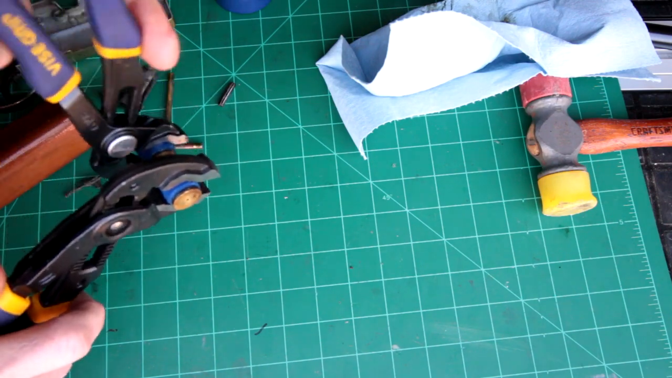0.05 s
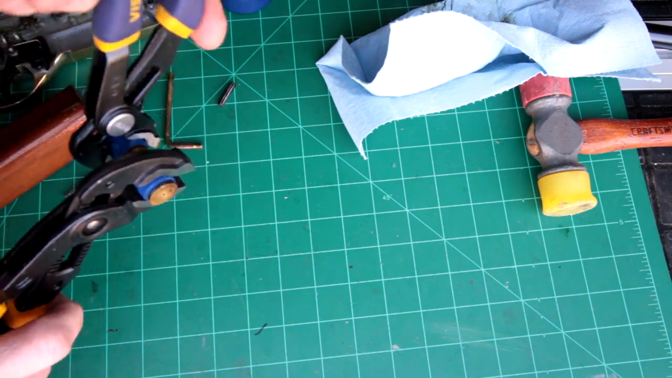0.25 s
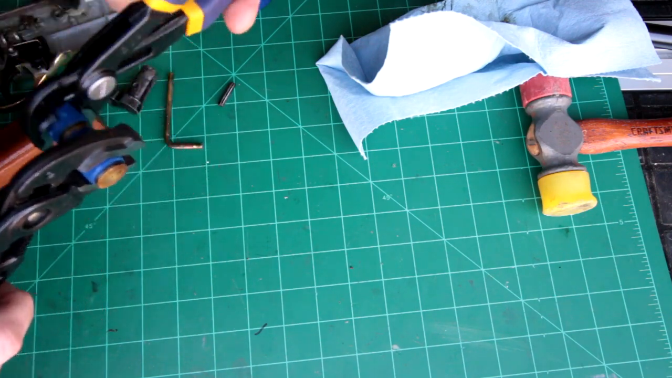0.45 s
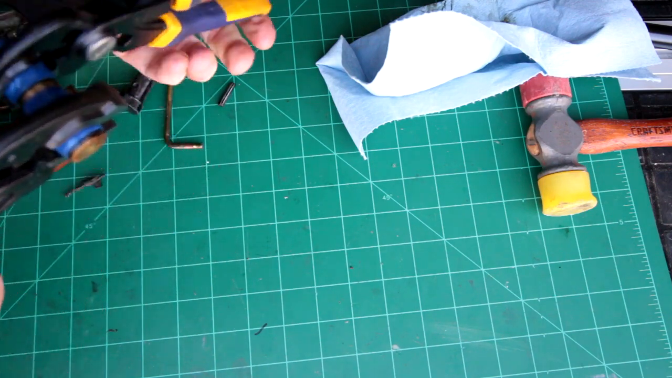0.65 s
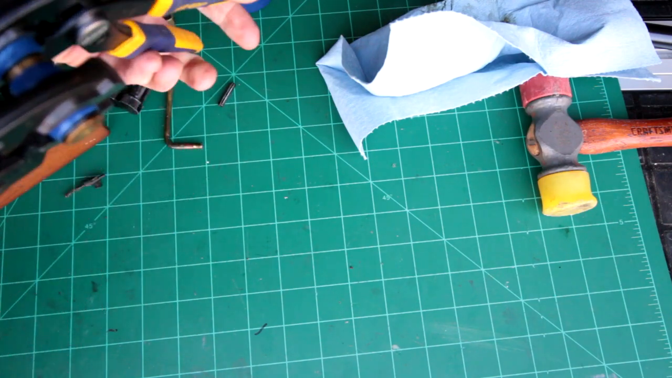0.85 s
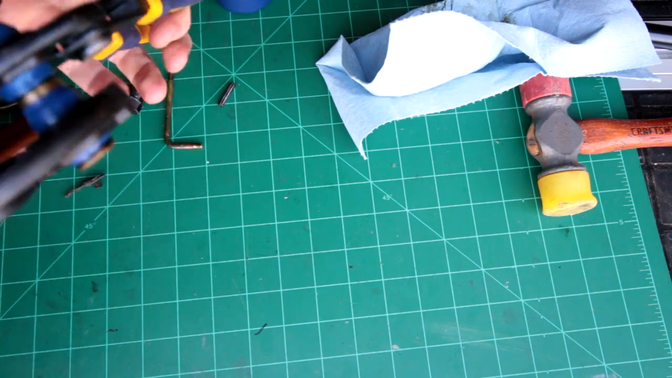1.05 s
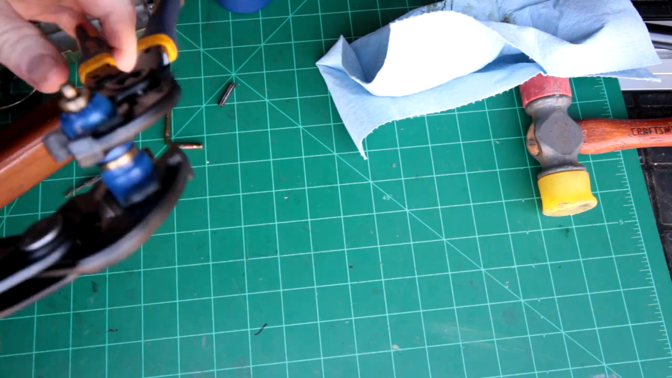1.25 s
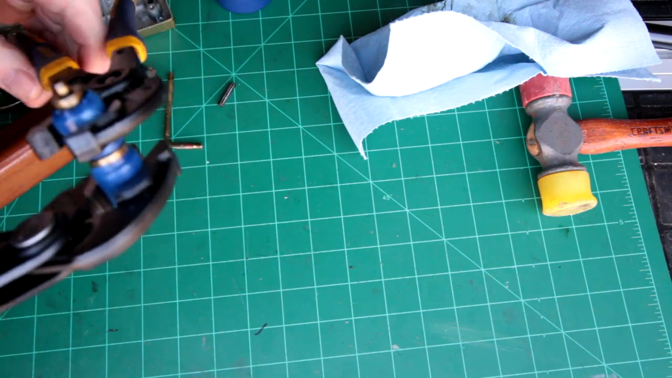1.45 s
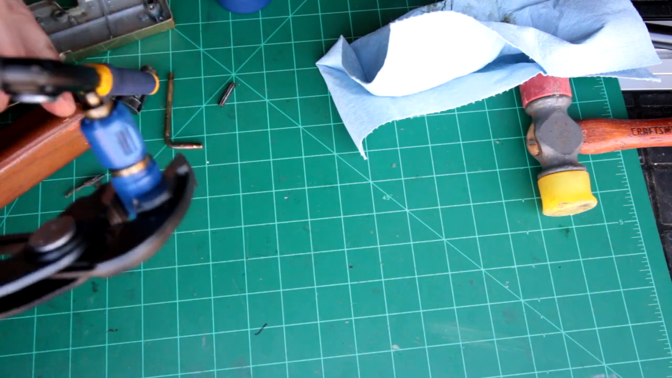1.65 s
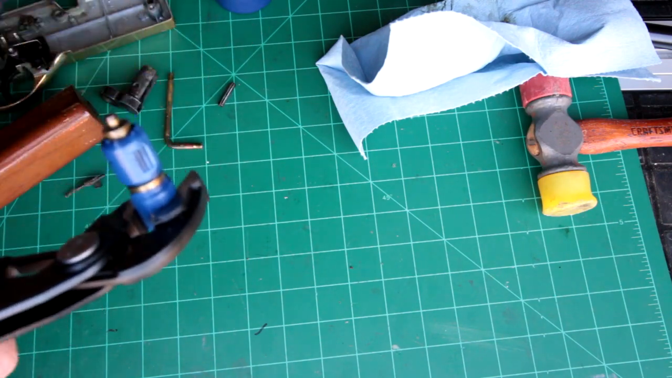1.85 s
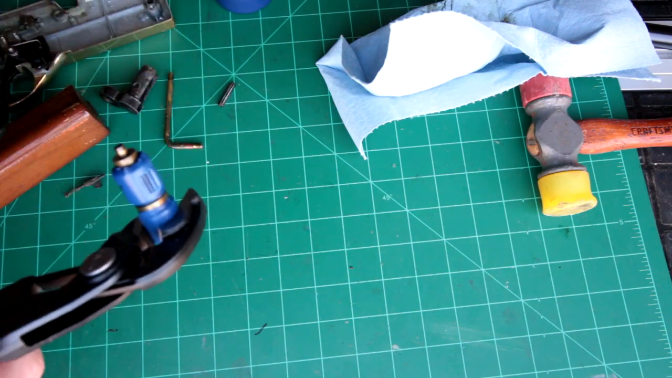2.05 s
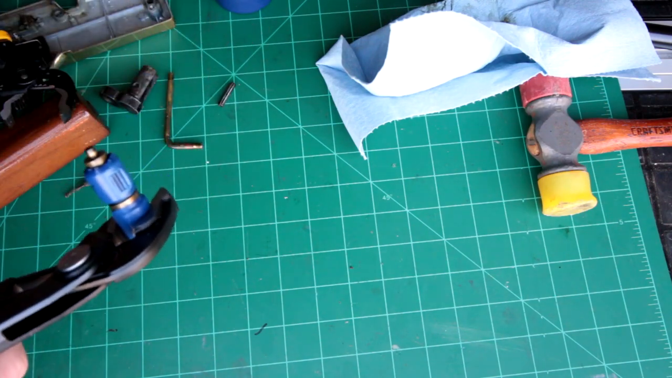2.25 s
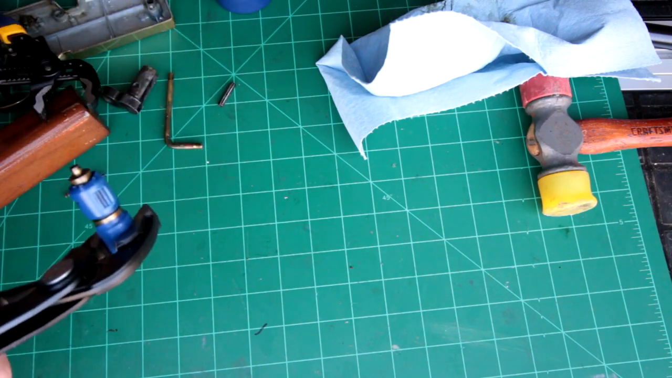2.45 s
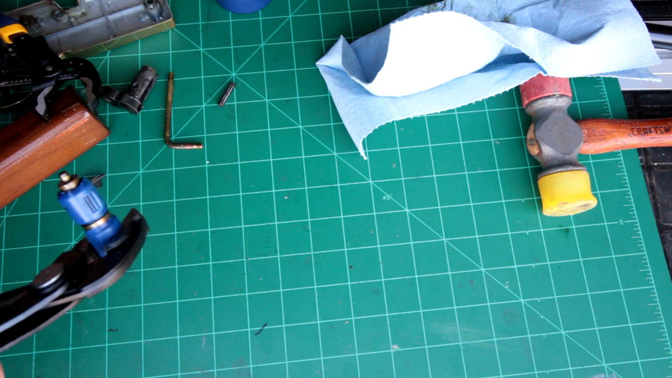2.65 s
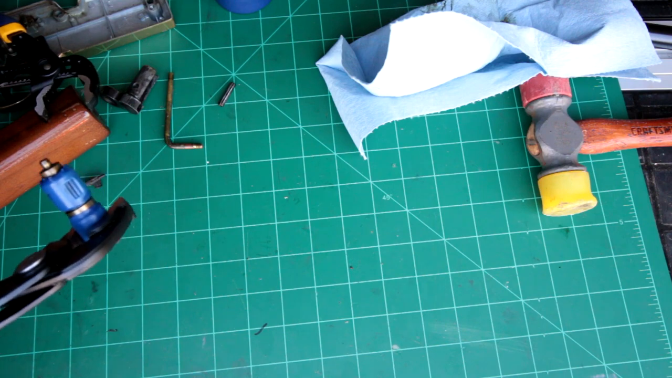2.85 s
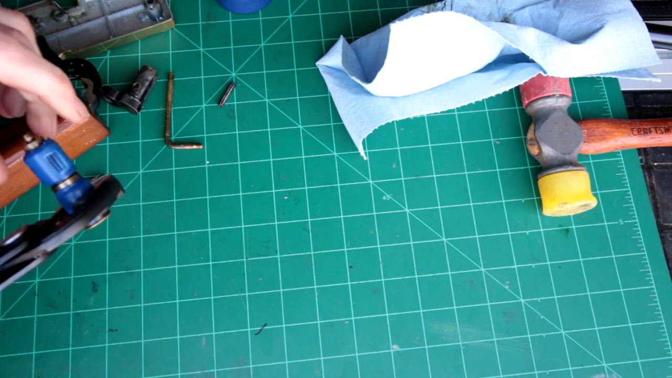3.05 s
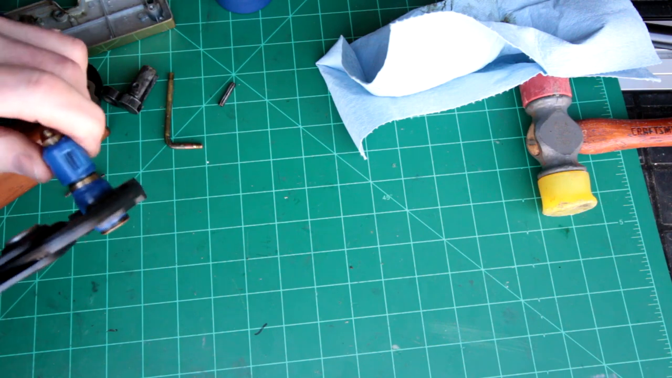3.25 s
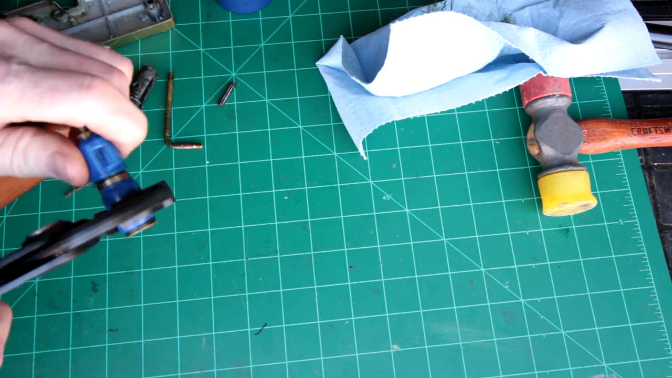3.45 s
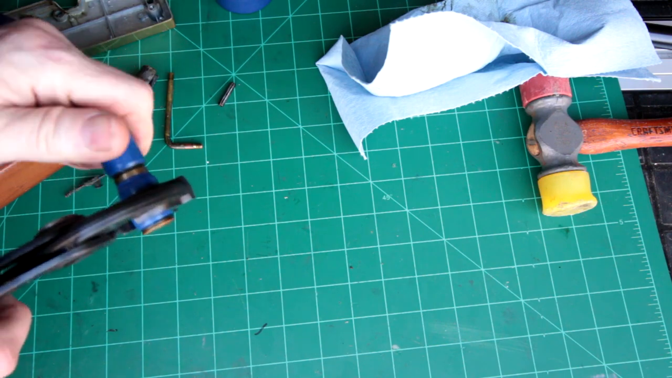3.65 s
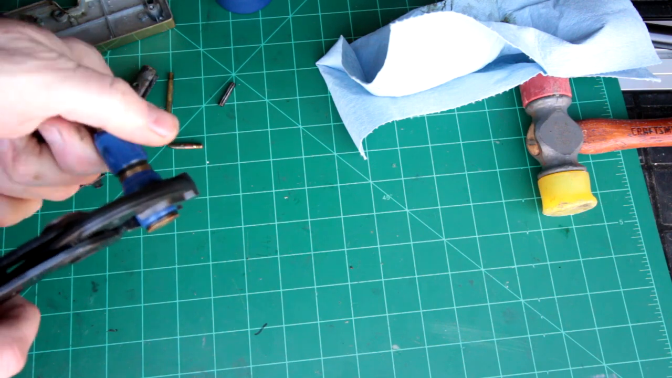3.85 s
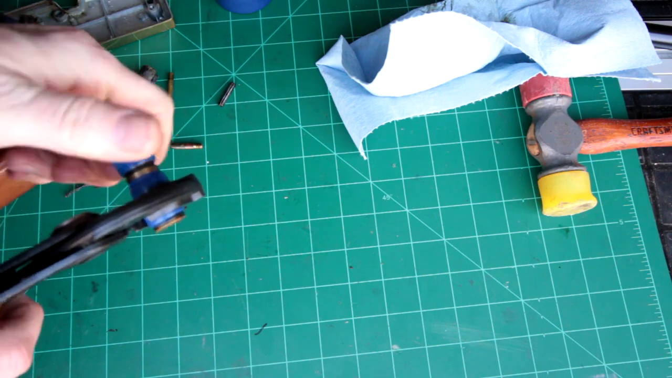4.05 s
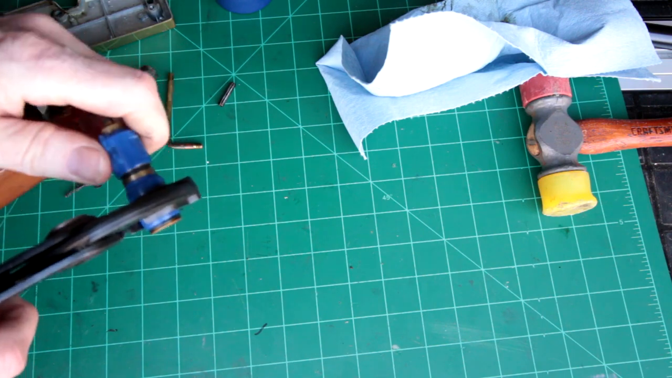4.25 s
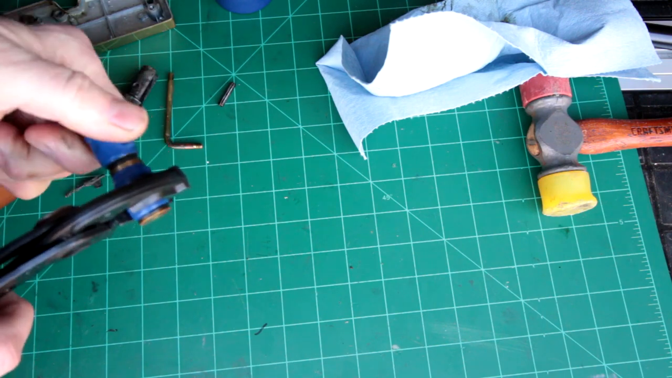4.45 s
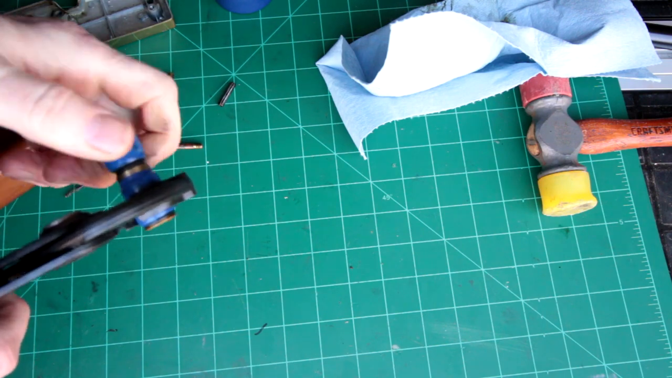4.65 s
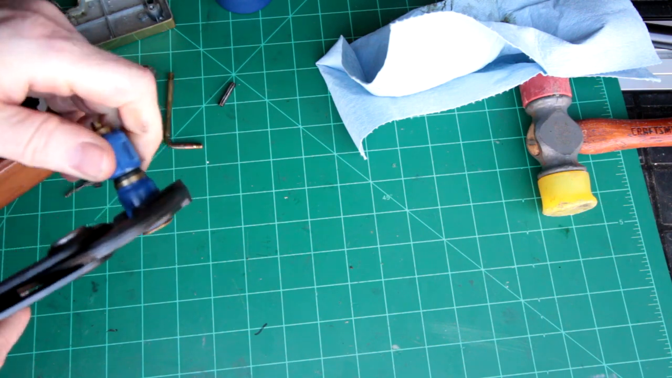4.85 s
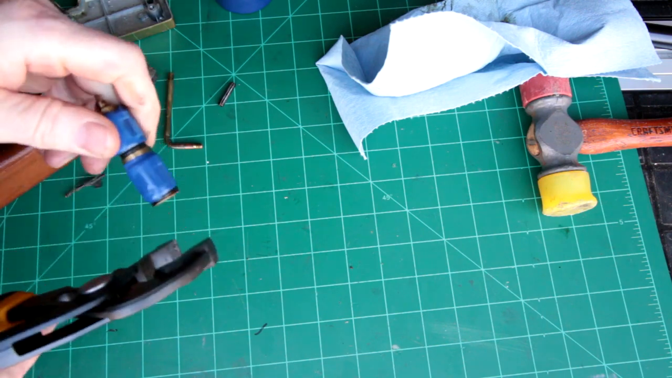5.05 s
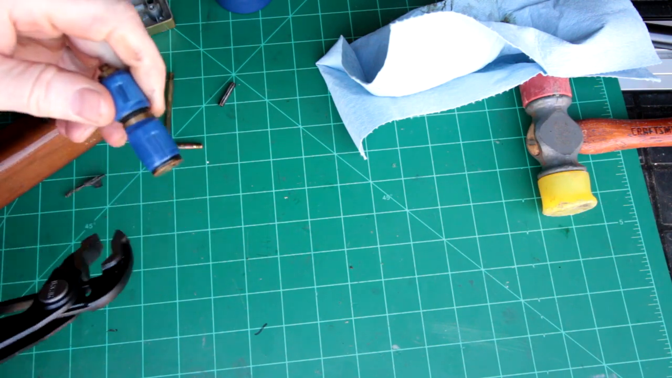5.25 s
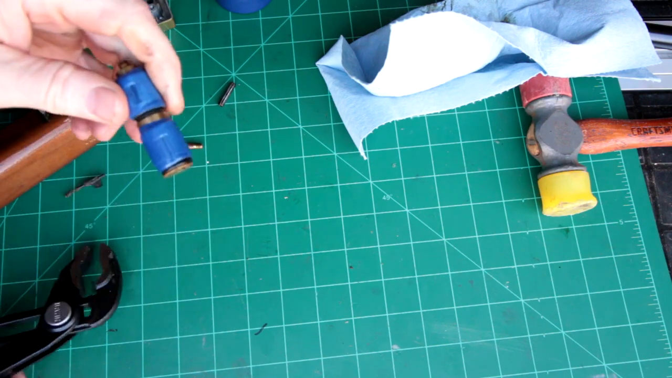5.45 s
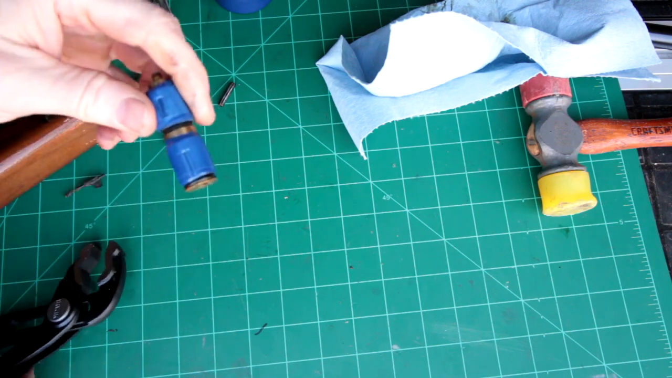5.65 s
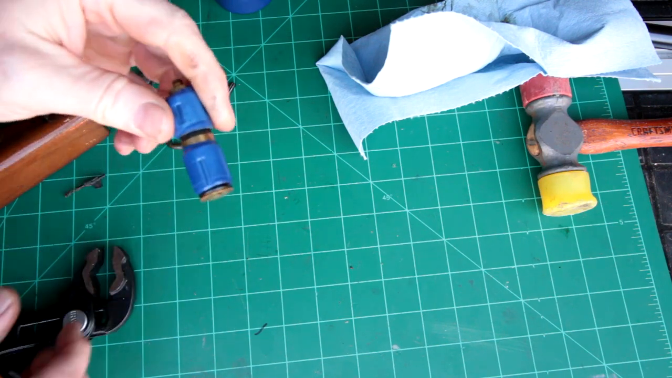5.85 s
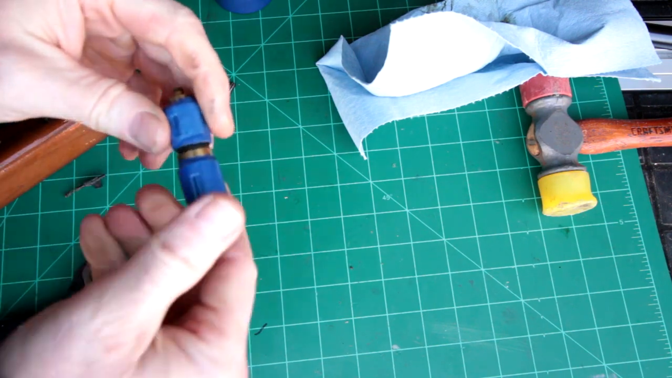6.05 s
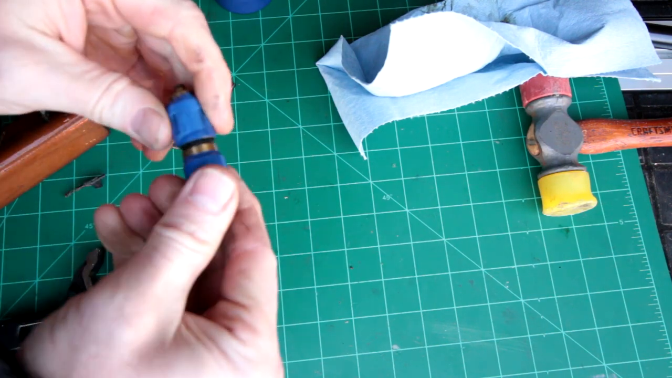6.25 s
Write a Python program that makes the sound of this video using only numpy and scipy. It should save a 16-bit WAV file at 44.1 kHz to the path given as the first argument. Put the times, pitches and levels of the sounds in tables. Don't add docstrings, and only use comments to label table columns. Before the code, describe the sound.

Near silence with faint hand rubs, then a small joint snap. Steel pliers hit a matted wooden table with a bright ringing crack, bounce briefly and settle with a duller knock. After a long quiet gap, another joint snaps and second pliers land in stages, ending in a heavy flat thump and fading rattles. Very close microphone, small room, soft hiss.

```python
import sys
import numpy as np
from scipy import signal
from scipy.fft import rfft, irfft, next_fast_len
from scipy.io import wavfile
from scipy.ndimage import uniform_filter1d

SR = 44100
rng = np.random.default_rng(int(sys.argv[2]) if len(sys.argv) > 2 else 0)


def dump_mix(stems):
    frames = np.atleast_2d(stems).T
    limited = np.clip(frames, -1, 1)
    pcm = np.round(limited * 32767).astype(np.int16)
    wavfile.write(sys.argv[1], SR, pcm)


def gain_from_decibels(decibels):
    exponent = np.asarray(decibels, float) / 20
    return 10 ** exponent


N = 278712


def unit(x):
    return x / np.sqrt(np.mean(x ** 2) + 1e-20)


def along(points, hz):
    f, value = np.transpose(points)
    return np.interp(np.log(hz + 1), np.log(f + 1), value)


def filtered(x, response):
    size = next_fast_len(x.shape[-1] + 4096)
    spectrum = rfft(x, size) * response(np.fft.rfftfreq(size, 1 / SR))
    return irfft(spectrum, size)[..., :x.shape[-1]]


def band(hz, width_hz, size):
    noise = rng.standard_normal(size)
    return unit(filtered(noise, lambda f: 1 / (1 + ((f - hz) / (width_hz / 2)) ** 2)))


def ringing(modes, t, attack, scatter_db, rough):
    hz, db, t60 = np.transpose(modes)[..., None]
    strength, detune = rng.standard_normal((2,) + hz.shape)
    wander = rough * np.cumsum(rng.standard_normal((len(modes), len(t))), axis=1) * np.sqrt(hz / SR)
    wander = uniform_filter1d(wander, size=64, axis=1)
    phase = 2 * np.pi * hz * (1 + rough / 80 * detune) * t + wander - wander[:, :1]
    level = gain_from_decibels(db + scatter_db * strength - 60 * t / t60)
    return (level * np.sin(phase)).sum(0) * (1 - np.exp(-t / attack))


def burst(spectrum, t, t60):
    noise = unit(filtered(rng.standard_normal(len(t)), lambda hz: gain_from_decibels(along(spectrum, hz))))
    return noise * gain_from_decibels(-60 * t / t60) * (1 - np.exp(-t / 0.000075))


def pliers(contacts, steel, rattle, crack_t60, spark_t60, wash_db, wash_t60, spark_db, edge_db):
    # f/Hz, level/dB, t60/s
    table_low = [(87, -8, 0.21), (121.5, -11.5, .1), (161.6, 2, 0.08), (180.7, -6, 0.061),
                 (238.25, -7.5, .06), (288.2, 2, 0.067), (340.2, -1, 0.068)]
    table_high = [(427.7, 6.5, 0.042), (520, -7.5, 0.058), (627.6, -14, 0.14), (797.4, 1, .04),
                  (900, -8.5, .04), (1104, -9.5, 0.021), (1151.4, -2.5, 0.026), (1400, -5, .03)]
    # f/Hz, level/dB
    crack = [(700, -15), (1500, 3), (2500, 3), (4000, -4), (6000, -13), (9000, -29)]
    spark = [(4000, -19.5), (6500, 6.5), (9000, 3.5), (11500, -6.5), (14000, -5.5), (17000, -11.5)]
    wash = [(200, -23.5), (600, 0), (1100, 5), (2500, -2), (4200, -11), (5500, -19.5), (8000, -29),
            (14000, -39)]
    flight_s = .045
    rattle_s, uneven_db = .003, 0.5
    out, t, last = np.zeros(N + SR), np.arange(SR // 4) / SR, 0
    for s, crack_db, thump_db, knock_db, ring_db in contacts:
        hit = gain_from_decibels(crack_db - 7) * burst(crack, t, crack_t60)
        edge_shift_db = edge_db * (s - last > flight_s)
        hit += gain_from_decibels(crack_db + spark_db + edge_shift_db) * burst(spark, t, spark_t60)
        buzz = unit(uniform_filter1d(rng.standard_normal(len(t)), round(rattle_s * SR)))
        hit += gain_from_decibels(crack_db + wash_db + uneven_db * buzz) * burst(wash, t, wash_t60)
        hit -= gain_from_decibels(thump_db - 3) * ringing(table_low, t, .002, scatter_db=2.5, rough=.5)
        hit -= gain_from_decibels(knock_db - 8) * ringing(table_high, t, .001, scatter_db=3, rough=.5)
        hit += gain_from_decibels(ring_db + 3) * ringing(steel, t, .0008, scatter_db=1.5, rough=rattle)
        out[round((s + .0006) * SR):][:len(t)] += hit
        last = s
    return out[:N]


def first_pliers():
    # t/s, crack peak/dB, table thump/dB, table knock/dB, steel ring/dB
    landing = [
        (2.2392, -3.5, -56, -9, -14.5),
        (2.2426, -4, -48.5, -19, -37.5),
        (2.2554, -19.5, -22, -23, -46),
        (2.2654, -24.5, -18.5, -19, -41),
        (2.2757, -11.5, -22.5, -23, -18.5),
        (2.2834, -9.5, -34, -19, -22.5),
        (2.2994, -19.5, -31.5, -23.5, -43.5),
    ]
    settling = [
        (2.391, -37.5, -34, -28.5, -55),
        (2.5157, -56, -42, -49, -77),
        (2.5267, -46.5, -36, -48, -75),
        (2.577, -20.5, -22, -17, -49),
        (2.5833, -47, -25, -22.5, -45.5),
    ]
    # f/Hz, level/dB, t60/s
    steel_free = [(2624, 0, .065), (2660, -8, .1), (2590, -32, .26), (2730, -24, .14), (2900, -14, .04),
                  (3290, -11, .06), (3420, -19, .16), (3600, -13, .05), (4490, -33, .16), (4800, -15, .02),
                  (5300, -15, .035), (6713, -30, .14), (7550, -30, .08)]
    steel_held = [(1040, -4, 0.1), (1600, -14, .06), (2200, 6.5, 0.037), (2613, 13, 0.045),
                  (3300, -11, 0.088), (3800, -15, 0.078), (4400, -9.5, 0.11)]
    out = pliers(landing, steel_free, 0.26, 0.0096, .016, wash_db=-21.5, wash_t60=0.11, spark_db=-28.5, edge_db=11)
    out += pliers(settling, steel_held, .4, .015, .015, wash_db=-19, wash_t60=.22, spark_db=-24, edge_db=9)
    return out


def second_pliers():
    # t/s, crack peak/dB, table thump/dB, table knock/dB, steel ring/dB
    handles = [
        (5.5173, -17.5, -12, -14, -49),
        (5.5503, -29.5, -21.5, -25.5, -46),
        (5.6171, -44.5, -39, -38.5, -80),
        (5.6575, -46.5, -49, -51, -71),
    ]
    jaws = [
        (5.7046, -16, -16.5, -17.5, -37),
        (5.7074, -17.5, -35, -32.5, -18.5),
        (5.7122, -11, -24, -22, -35),
        (5.7199, -31, -20.5, -16.5, -47),
        (5.7445, -42, -35.5, -30.5, -55.5),
    ]
    flat = [
        (5.8746, -2.5, -7, -12.5, -40),
        (5.8774, -5.5, -40.5, -4.5, -20),
        (5.8837, -18.5, -23.5, -17.5, -32.5),
        (5.9067, -23.5, -18.5, -18.5, -34.5),
        (5.9224, -36.5, -22, -33, -45.5),
        (5.9683, -22, -31, -26, -41),
        (5.9764, -42.5, -27, -31, -58),
        (6.0024, -49.5, -50, -35.5, -71),
        (6.094, -48, -55, -42.5, -70),
    ]
    # f/Hz, level/dB, t60/s
    steel = [(1975, -3, .02), (2250, -4, .02), (2800, -3, .025), (3400, 0, .025), (3400, -24, .21),
             (3650, -29, .12), (3150, -26, .14), (3500, -27, .16), (5400, -10, .012)]
    pressed = [mode for mode in steel if mode[2] < .1]
    out = pliers(handles, steel, 0.5, 0.013, 0.013, wash_db=-13, wash_t60=0.09, spark_db=-22, edge_db=-4)
    out += pliers(jaws, steel, 0.29, 0.017, 0.015, wash_db=-34.5, wash_t60=0.1965, spark_db=-19, edge_db=5)
    out += pliers(flat, pressed, .4, .012, .012, wash_db=-23, wash_t60=.2, spark_db=-20, edge_db=-8)
    return out


def joints():
    # t/s, crack peak/dB, table thump/dB, table knock/dB, steel ring/dB
    snaps = [
        (1.7481, -25, -78, -60, -41),
        (5.4196, -17.5, -60, -61, -30.5),
    ]
    touches = [
        (2.5692, -45, -52, -43, -72),
        (5.6897, -39, -28, -36, -41.5),
    ]
    # f/Hz, level/dB, t60/s
    steel = [(1500, -10, .01), (2120, -7, .05), (2700, -1, .012), (3300, -4, .015), (3880, -24, .22),
             (3950, -3, .018)]
    out = pliers(snaps, steel, .4, 0.008, .01, wash_db=-38, wash_t60=0.05, spark_db=-18, edge_db=0)
    out += pliers(touches, steel, 0.28, 0.012, 0.0105, wash_db=-27.5, wash_t60=0.083, spark_db=-15.5, edge_db=5)
    return out


def pushes():
    # t/s, peak/dB, f/Hz
    swings = [(1.7517, -37.5, 3200), (2.2394, -7.5, 561.6), (2.2402, -26.5, 12710), (2.242, -10.5, 1245),
              (2.2664, -12.5, 1106), (2.5784, -19, 400), (2.584, -16.5, 79.9), (2.586, -20, 1040),
              (5.4202, -26.5, 3850), (5.4206, -39.5, 1550), (5.424, -58, 710), (5.5188, -5.5, 244.4),
              (5.518, -19, 1900), (5.5179, -18, 790), (5.551, -27.5, 826), (5.6178, -45.5, 3080),
              (5.6581, -47, 1887), (5.7053, -7, 520), (5.7183, -19.5, 262), (5.8755, 3, 278.4),
              (5.8759, -6.5, 2188), (5.8777, -17.5, 11820), (5.8779, -17, 5550), (5.9088, -14.5, 300),
              (5.969, -36, 4500), (6.0037, -47, 2400)]
    t60_s, soft_hz = 0.0061, 433
    out, t = np.zeros(N + SR), np.arange(SR // 4) / SR
    for s, db, hz in swings:
        fall_db = 60 * t / (t60_s * (1 + soft_hz / hz))
        rise = 1 - np.exp(-1.5 * hz * t)
        out[round(s * SR):][:len(t)] -= gain_from_decibels(db + 9 - fall_db) * np.sin(2 * np.pi * hz * t) * rise
    return out[:N]


def room(x):
    # f/Hz, t60/s
    decay = [(60, 0.37), (250, 0.62), (1000, 0.36), (4000, 0.47), (8000, .16), (15000, .08)]
    # f/Hz, level/dB
    strength = [(60, -3.5), (300, -19), (1500, -15.5), (4000, -21.5), (8000, -28), (15000, -24.5)]
    hz, t, z = signal.stft(rng.standard_normal((2, SR // 2)), SR, nperseg=256)
    fall_db = 60 * t / along(decay, hz)[:, None]
    tail = signal.istft(z * gain_from_decibels(along(strength, hz)[:, None] - fall_db), SR, nperseg=256)[1]
    delayed = np.pad(x, (150, 0))[None]
    mid, side = signal.fftconvolve(delayed, gain_from_decibels(-35.5) * tail, axes=1)[:, :N]
    side = filtered(side, lambda f: gain_from_decibels(along([(300, -61.0), (3000, -27), (12000, 5.5)], f)))
    return np.array([mid + side, mid - side])


def muting():
    # t/s, settling/s
    rests = [
        (2.72, 0.037),
        (6.04, 0.06),
    ]
    mute_db, hold_s = -12.5, 0.22
    t = np.arange(N) / SR
    muted = sum(np.clip((t - s) / settle_s, 0, 1) * (t < s + hold_s) for s, settle_s in rests)
    return gain_from_decibels(mute_db * muted)


def rubbing(rows):
    out, half = np.zeros(N + SR), SR // 4
    t = np.arange(-half, half) / SR
    for s, db, hz, width_hz, length in rows:
        swell = np.exp(-(2 * t / length) ** 2)
        out[round(s * SR):][:len(t)] += gain_from_decibels(db) * swell * band(hz, width_hz, size=len(t))
    return out[half:N + half]


def squeaks():
    # t/s, peak/dB, f/Hz, length/s
    teeth = [(0.388, -64.5, 3420, 0.036), (1.18, -74.5, 3280, .083), (1.541, -72, 3300, .032),
             (2.704, -68.5, 3800, 0.023), (3.447, -70, 4400, 0.0081), (3.761, -72.5, 3300, .029),
             (3.772, -67.5, 1120, .014), (4.946, -60.5, 3900, 0.0058), (4.969, -63, 1600, 0.0071),
             (5.001, -63, 1300, .008), (5.004, -70.5, 3410, 0.025), (5.08, -64.5, 1640, 0.01),
             (5.288, -64.5, 2020, 0.039), (5.289, -67, 3475, .031)]
    return rubbing([(s, db, hz, 380, length) for s, db, hz, length in teeth])


def fingers():
    # t/s, peak/dB, f/Hz, length/s
    slips = [(.39, -71, 1500, .02), (0.693, -71, 2060, 0.13), (0.725, -67.5, 3130, 0.086),
             (.735, -73, 1300, .06), (.873, -66, 1200, 0.0092), (1.435, -70, 2640, .03),
             (3.637, -72.5, 2523, 0.023), (3.907, -73.5, 3663, .055), (4.502, -73.5, 2200, .04)]
    return rubbing([(s, db, hz, 1200, length) for s, db, hz, length in slips])


def knuckles():
    # t/s, peak/dB, f/Hz, length/s
    nudges = [(0.042, -64, 78, 0.038), (0.407, -56, 106, 0.023), (0.855, -71, 98, .11),
              (0.872, -58.5, 406, 0.01), (2.852, -73, 89, 0.27), (3.24, -59, 141.3, 0.027),
              (5.002, -51, 497, .01), (5.003, -55, 87, 0.017), (5.082, -57, 500, 0.011),
              (6.06, -53.5, 93, 0.052), (6.2, -64, 130, 0.27)]
    relative_width = 0.83
    return rubbing([(s, db, hz, relative_width * hz, length) for s, db, hz, length in nudges])


def palms():
    # t/s, peak/dB, length/s
    rubs = [
        (1.949, -72, 0.17),
        (3.158, -77, 0.17),
        (5.096, -74, 0.16),
    ]
    centre_hz, width_hz = 830, 1600
    return rubbing([(s, db, centre_hz, width_hz, length) for s, db, length in rubs])


def arm():
    # t/s of full weight, level/dB, lean-in/s, lift/s
    leans = [(.86, -74.5, .6, 0.17), (1.22, -67.5, 0.24, 0.21), (2.15, -71, .7, 0.073),
             (2.43, -56, .15, 0.086), (3.22, -65.5, .35, 0.46), (4.99, -64.5, .15, 1),
             (5.7, -59.5, .2, 0.11), (5.88, -46, .1, .08), (6.3, -67.5, .2, .3)]
    # f/Hz, level/dB
    sleeve = [(300, 1), (500, 2), (1200, -5.5), (3000, -11), (5000, -24.5)]
    lean_range_db, rest_db = 12.5, -82.5
    rustle_db, rustle_grows = -72, 0.4
    t = np.arange(N) / SR
    weights = [db - lean_range_db * np.maximum((s - t) / lean_s, (t - s) / lift_s)
               for s, db, lean_s, lift_s in leans]
    weight_db = np.maximum(np.max(weights, axis=0), rest_db)
    drone = gain_from_decibels(weight_db - 1.5) * band(300, 37, size=N)
    rustle = unit(filtered(rng.standard_normal(N), lambda hz: gain_from_decibels(along(sleeve, hz))))
    return drone + gain_from_decibels(rustle_db - 5.5 + rustle_grows * (weight_db - rest_db)) * rustle


def stand():
    # t/s, level/dB, t60/s
    jolts = [
        (2.6, -57, 1.1),
        (2.75, -57.5, 0.96),
        (5.935, -26, 0.16),
        (5.972, -26.5, .25),
        (6.055, -35, 1.5),
    ]
    sway_hz, rise_s = 35.15, 0.011
    out, shiver = np.zeros(N), .45 * band(40, 14, size=N)
    for s, db, t60 in jolts:
        t = np.maximum(np.arange(N) / SR - s, 0)
        sway = np.sin(2 * np.pi * sway_hz * t) + shiver
        out += gain_from_decibels(db - 60 * t / t60) * (1 - np.exp(-t / rise_s)) * sway
    return out


def hush():
    # f/Hz, level/dB per Hz
    colour = [(15, -29), (30, -7), (60, -7), (120, -6), (240, -13), (550, -19), (2900, -22), (16200, -25)]
    # f/Hz, correlation [0..1]
    alike = [(60, 0.54), (180, 0.84), (550, 0.13), (1650, 0.19), (4970, 0.034), (15000, 0.02)]

    def mid_side(hz):
        turn = np.arccos(np.clip(along(alike, hz), -1, 1)) / 2
        return gain_from_decibels(along(colour, hz)) * [np.cos(turn), np.sin(turn)]

    mid, side = filtered(rng.standard_normal((2, N)), mid_side)
    return gain_from_decibels(-65.5 + 2.0) * unit(np.array([mid + side, mid - side]))


def scene():
    blows = first_pliers() + second_pliers() + joints() + pushes()
    blows = signal.sosfilt(signal.butter(2, 55, "high", fs=SR, output="sos"), blows)
    stretch = np.searchsorted([2.38, 2.55, 5.68, 5.86], np.arange(N) / SR)
    echo = sum(room(blows * (stretch == k)) for k in range(5))
    hands = squeaks() + fingers() + knuckles() + palms() + arm()
    return (blows + echo) * muting() + hands + stand() + hush()


def low_pass(x):
    return signal.sosfilt(signal.butter(12, 15750, fs=SR, output="sos"), x)


def record(dry):
    # t/s, left and right [full scale]
    drift = np.array([(0, -.00028, -.00021), (1.6, -.00028, -.00021), (2.9, .00099, .0006),
                      (5.2, .00099, .0006), (5.6, -.00014, -.00013)])
    t = np.arange(N) / SR
    x = dry + [np.interp(t, drift[:, 0], drift[:, side]) for side in (1, 2)]
    x = x / (1 + np.abs(x / .96) ** 12) ** (1 / 12)
    x = filtered(x, lambda hz: 1 / (1 + (hz / 15880) ** 120))
    return low_pass(x)


dry = scene()
out = record(dry)
dump_mix(out)
```